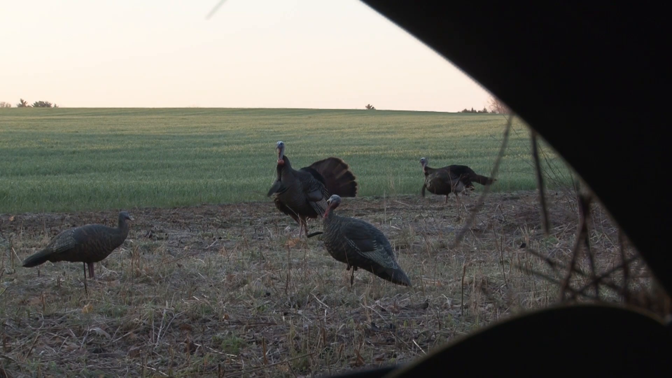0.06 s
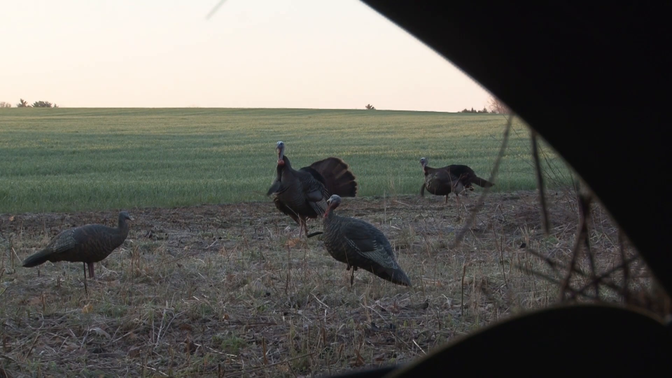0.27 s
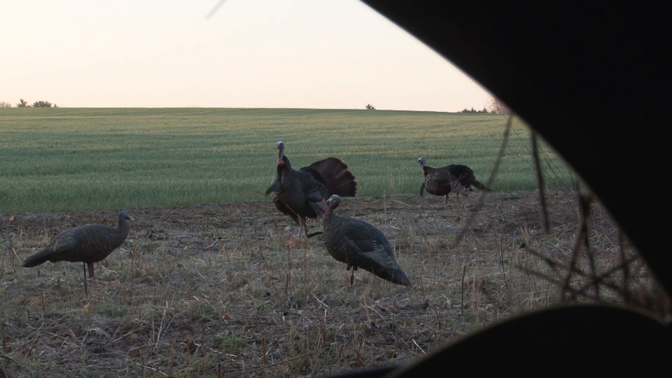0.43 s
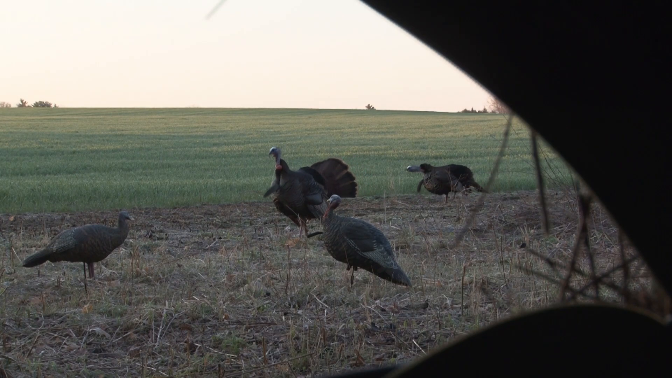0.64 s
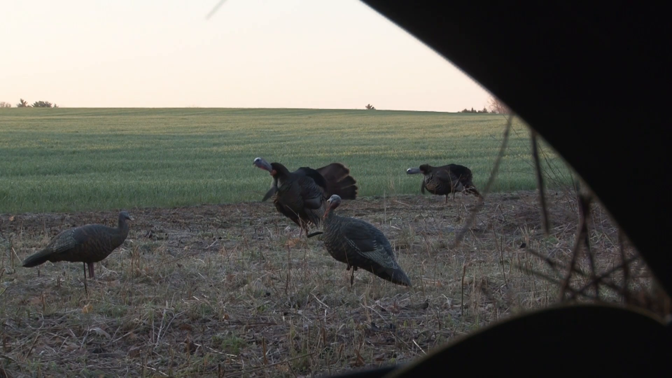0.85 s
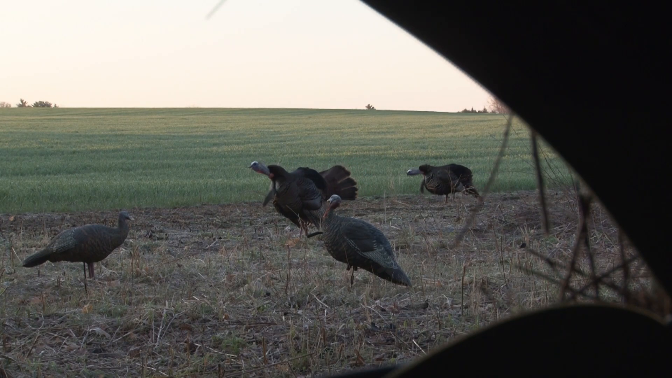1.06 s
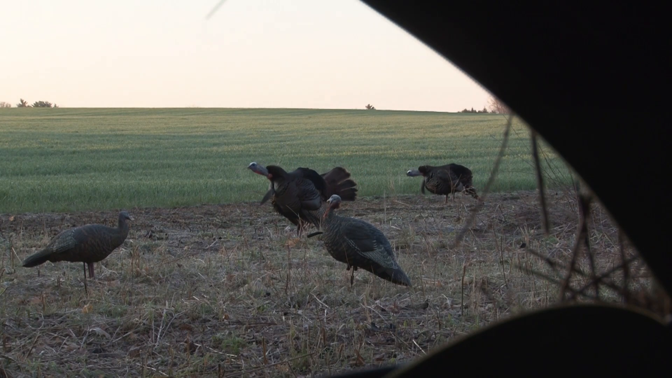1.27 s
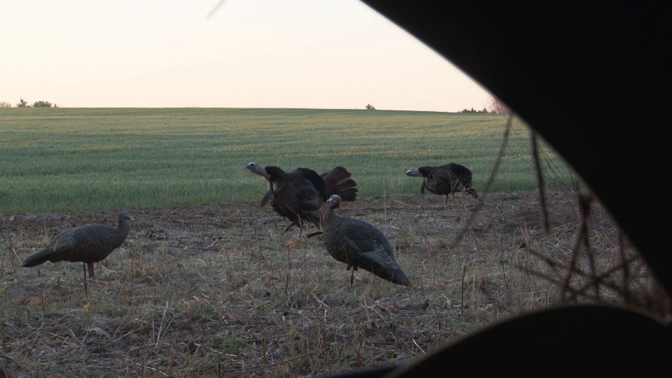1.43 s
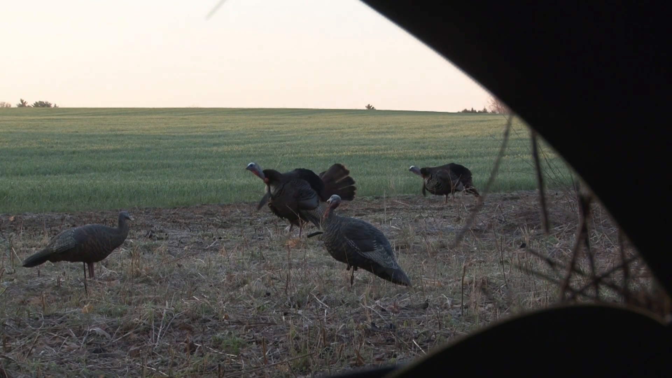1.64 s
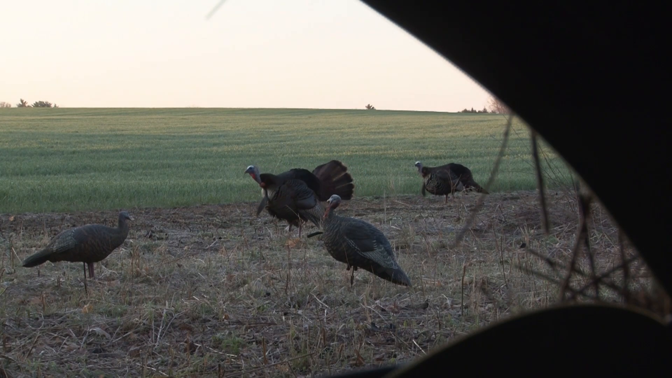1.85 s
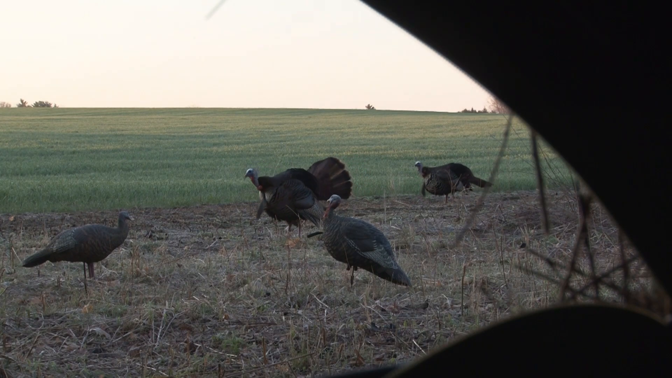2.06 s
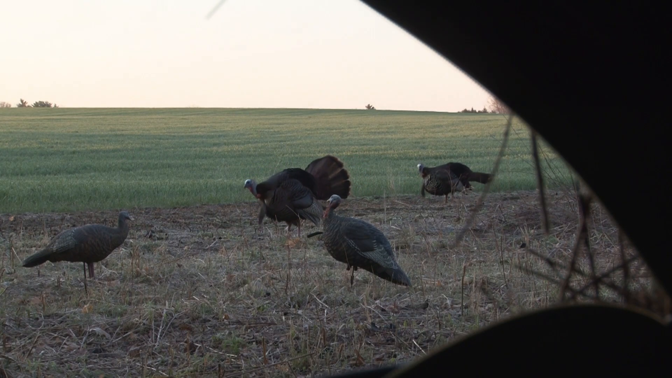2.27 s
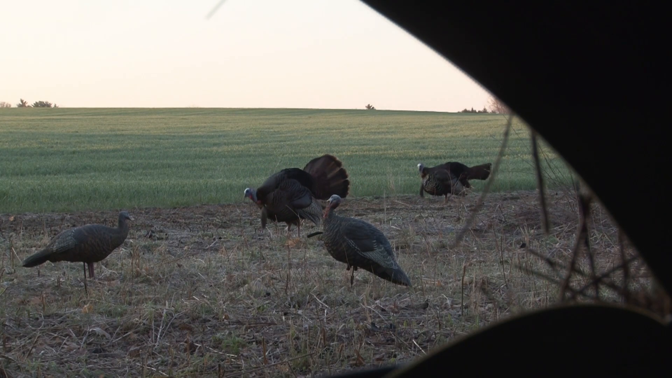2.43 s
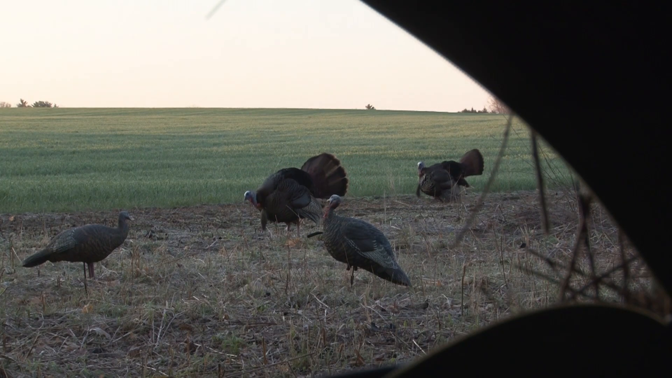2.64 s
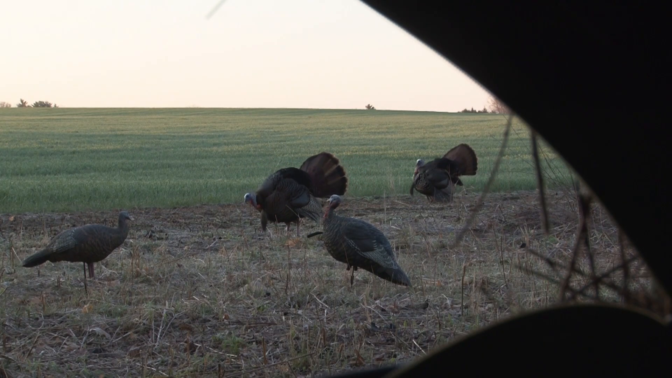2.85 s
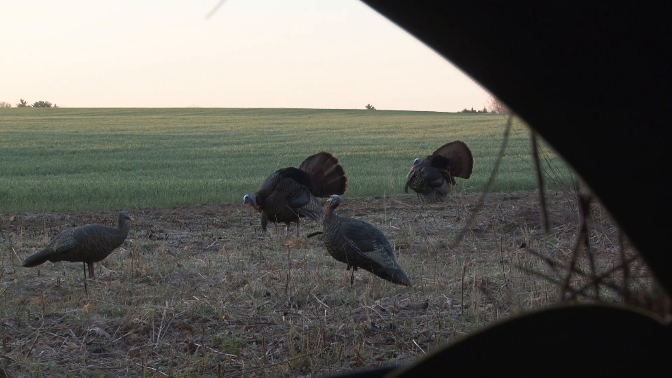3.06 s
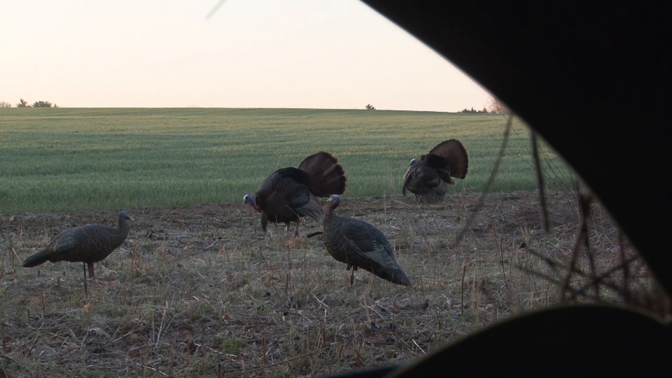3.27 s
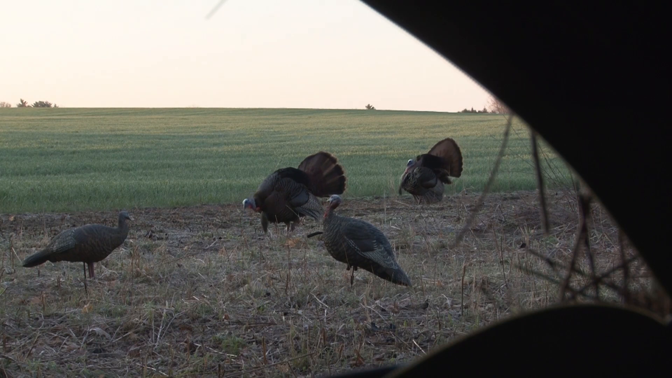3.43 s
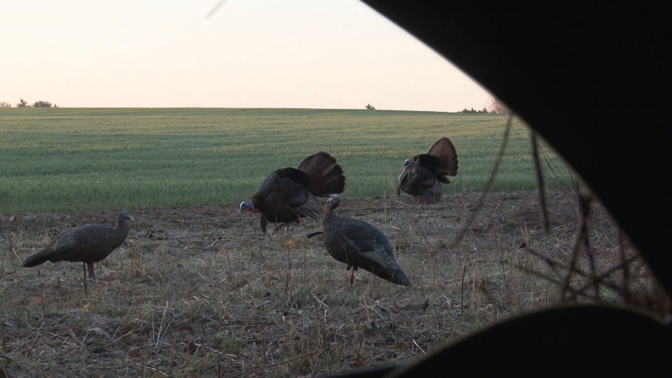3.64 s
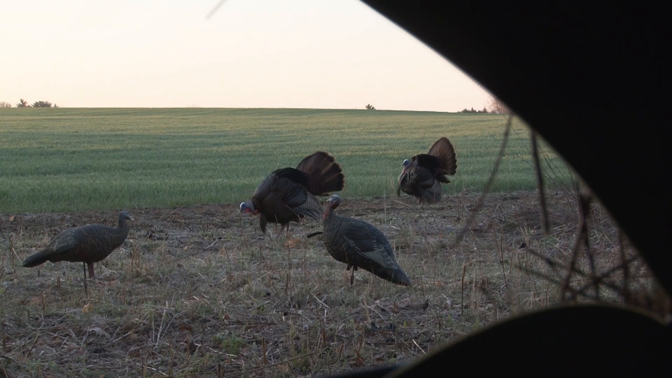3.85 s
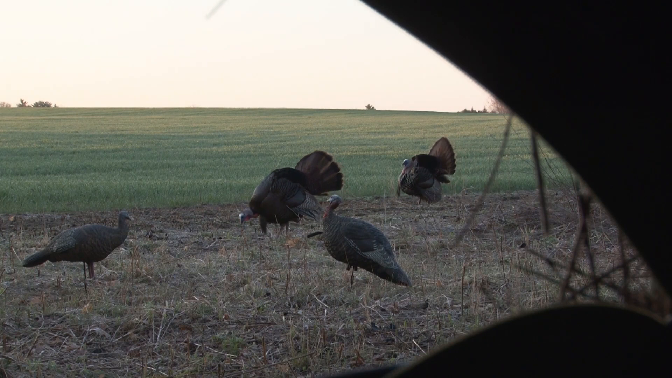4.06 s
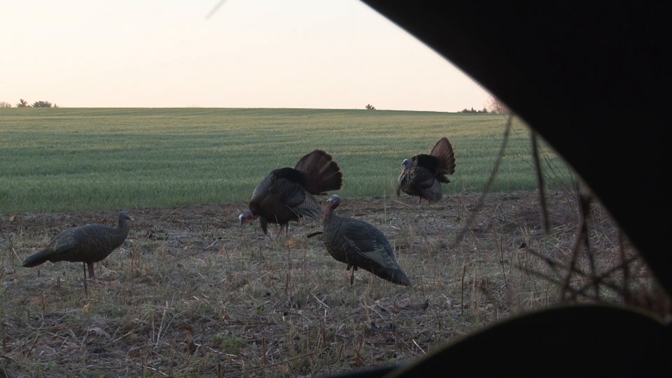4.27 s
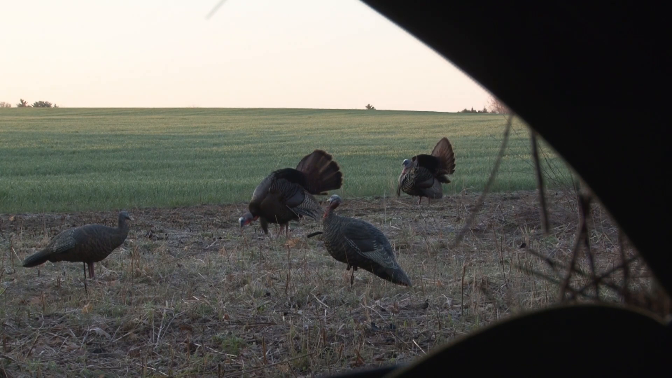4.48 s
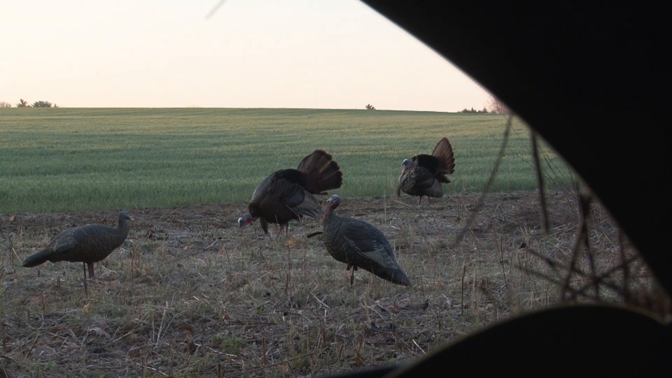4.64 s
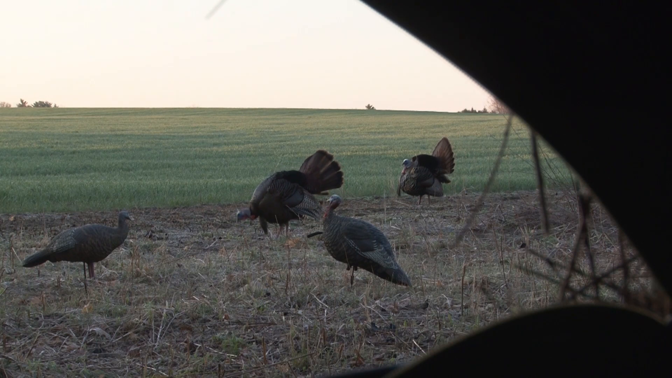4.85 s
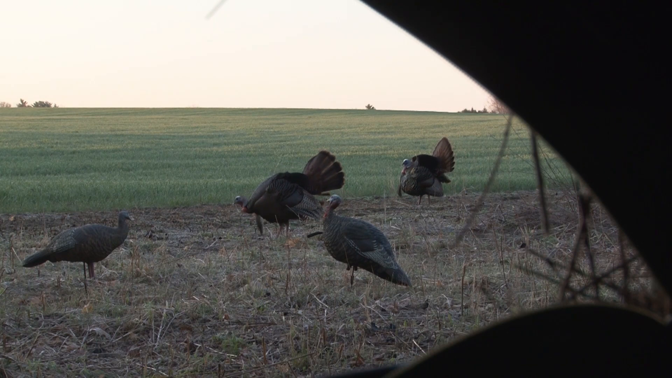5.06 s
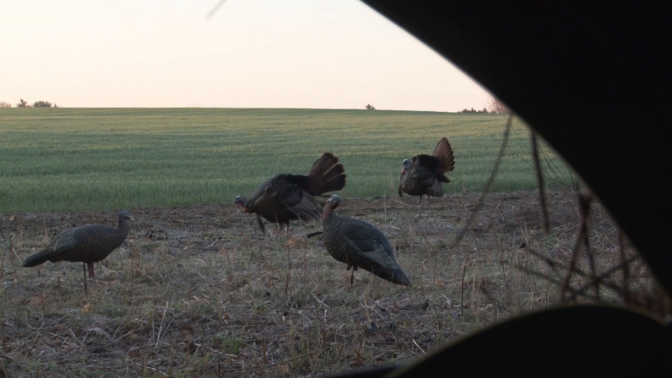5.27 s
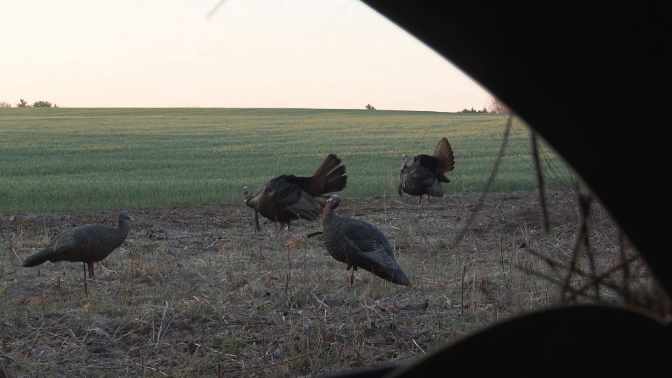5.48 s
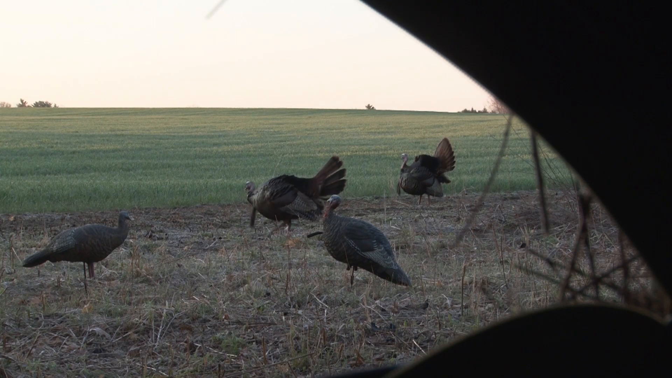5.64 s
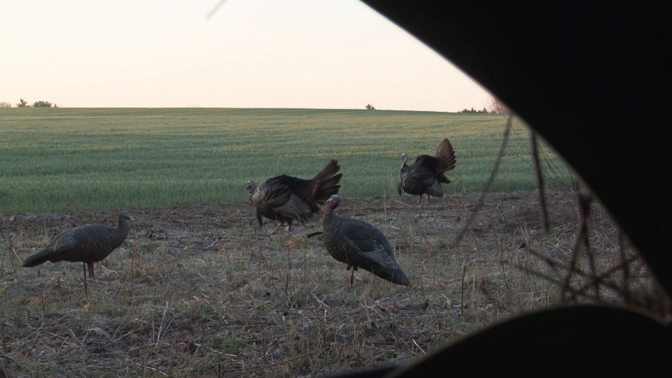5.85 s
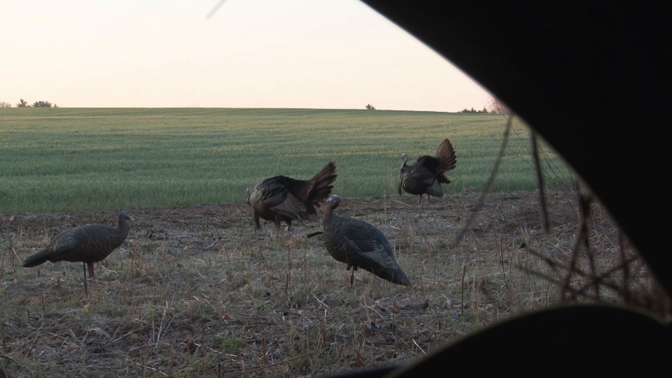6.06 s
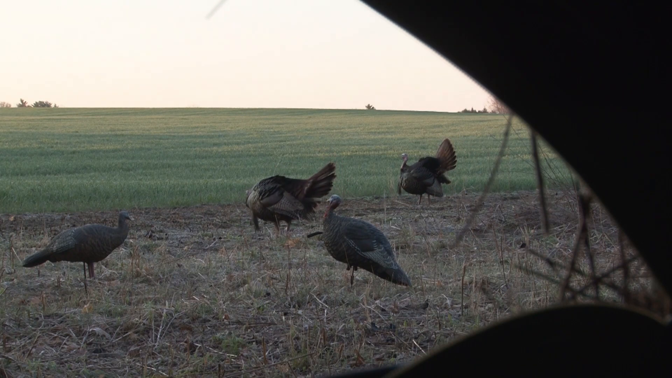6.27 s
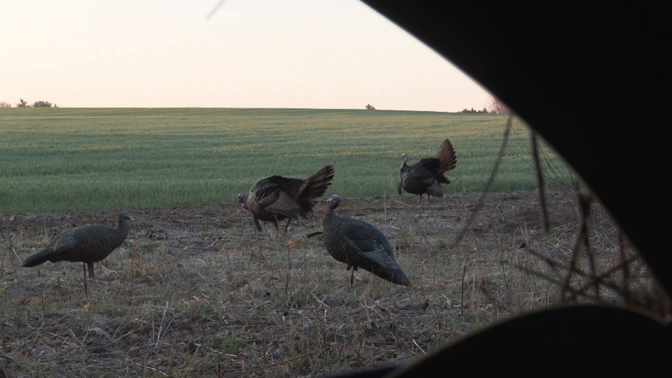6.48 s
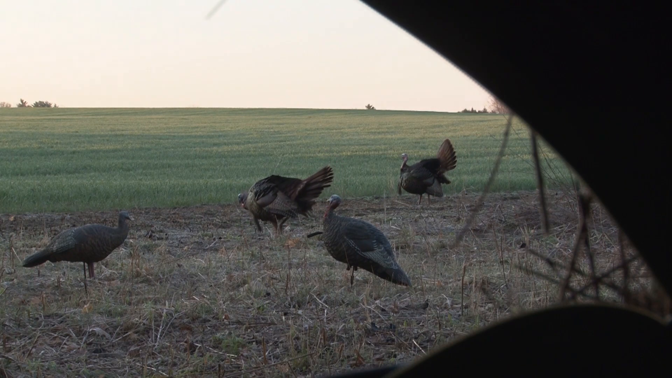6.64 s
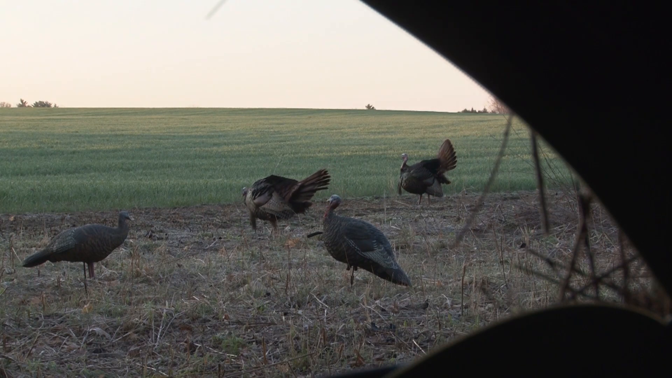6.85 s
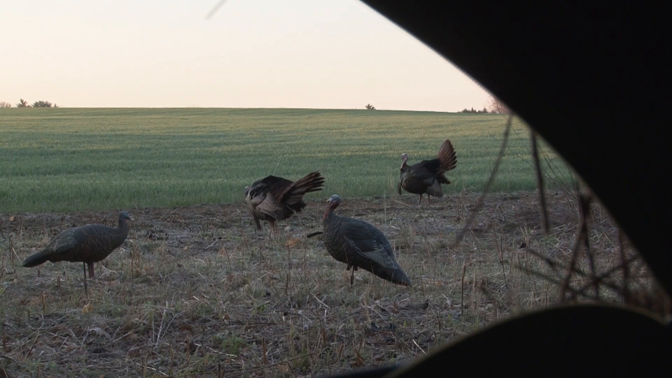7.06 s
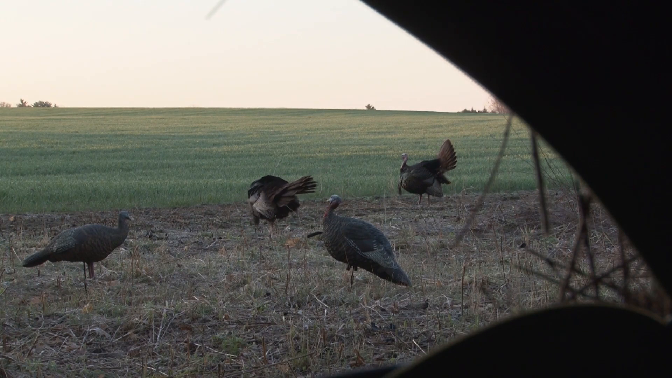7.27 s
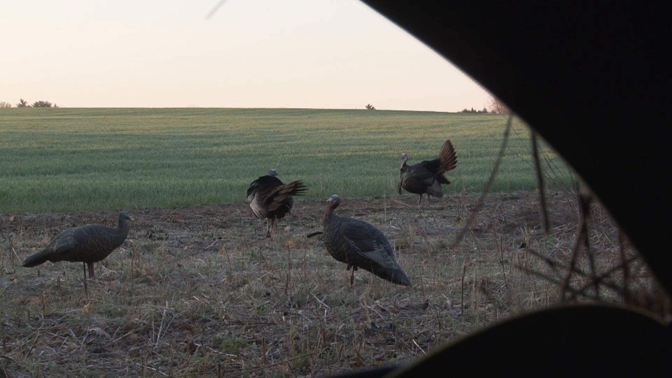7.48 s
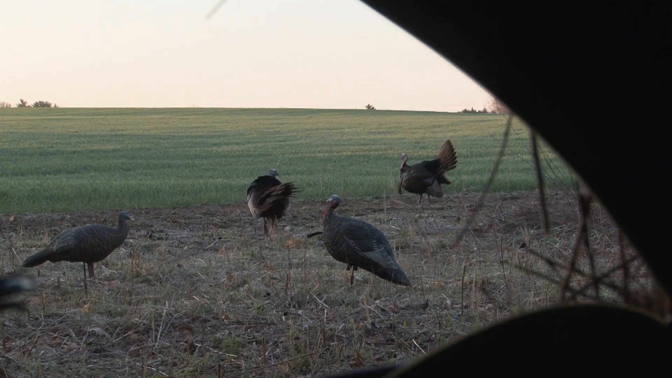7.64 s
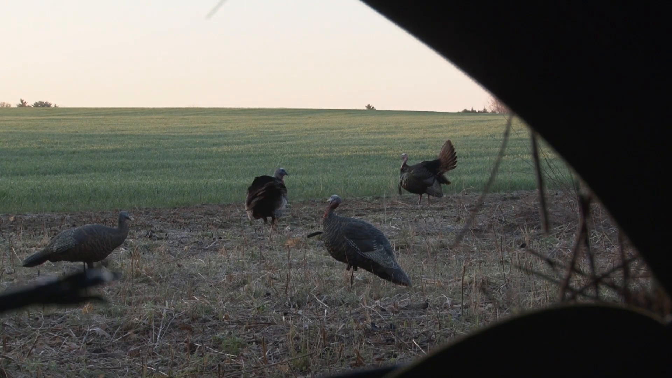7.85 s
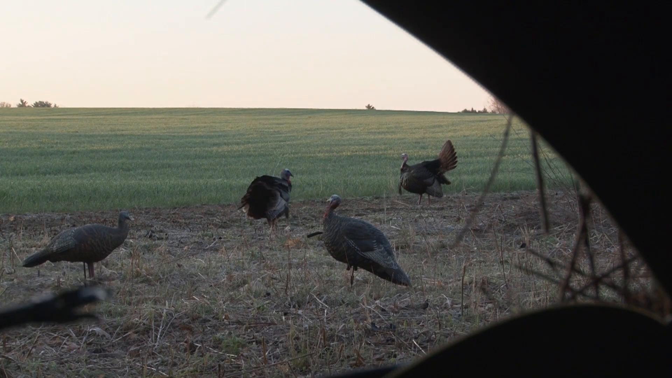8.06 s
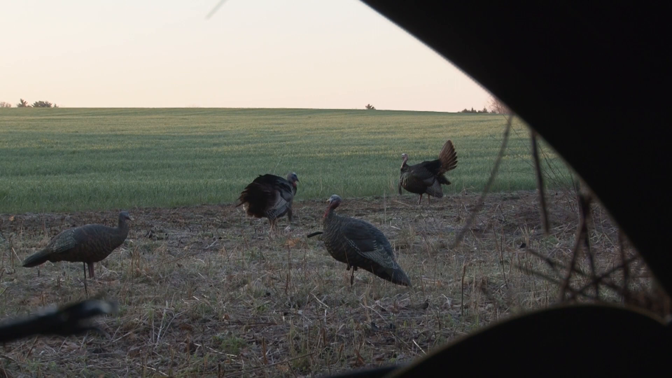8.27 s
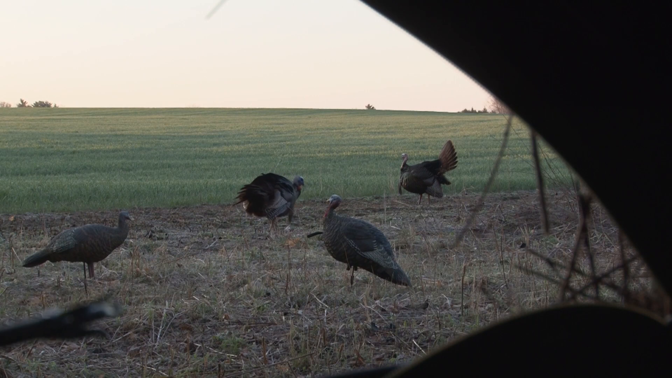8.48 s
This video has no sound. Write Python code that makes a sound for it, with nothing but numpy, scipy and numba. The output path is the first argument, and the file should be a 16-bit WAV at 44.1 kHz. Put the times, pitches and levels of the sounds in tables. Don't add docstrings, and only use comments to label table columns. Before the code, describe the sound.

Quiet open farmland with a low traffic hum and hiss. Two male turkeys erupt in one loud, overlapping, choppy gobble lasting just over a second, with sharp beak snaps and a short echoing tail. The background abruptly ducks, then returns calmer: a sharp stalk crack, dull footfalls, a breathy spit with deep drumming, thin insect chirps, small whistles, and finally rustling dry stubble. Heard in stereo from beside a hide, deep sounds leaning right.

```python
import sys
import numpy as np
from scipy import signal
from scipy.fft import rfft, irfft, next_fast_len
from scipy.io import wavfile
from scipy.ndimage import uniform_filter1d
from numba import njit

SR = 44100
rng = np.random.default_rng(int(sys.argv[2]) if len(sys.argv) > 2 else 0)


def volts(x):
    e = np.asarray(x, float) / 20
    return 10 ** e


def master_out(mix):
    frames = np.transpose(np.atleast_2d(mix))
    ceiling = np.clip(frames, -1, 1)
    pcm = np.round(ceiling * 32767).astype(np.int16)
    wavfile.write(sys.argv[1], SR, pcm)


N = 375291
T = np.arange(N) / SR

# [t/s, peak level/dB]
SNAPS = [
    (0.5984, -49.5),
    (0.7183, -53),
    (0.8114, -64),
    (0.9674, -55),
    (1.121, -50),
    (1.303, -48.5),
    (1.3841, -70),
    (1.658, -60),
]


def level(x, db):
    return x * volts(db) / np.sqrt(np.mean(x ** 2))


def colour(x, points):
    size = next_fast_len(N)
    hz, db = np.transpose(points)
    f_hz = np.arange(1, size // 2 + 2) * SR / size
    gain = volts(np.interp(np.log(f_hz), np.log(hz), db))
    return irfft(rfft(x, size) * gain, size)[..., :N]


@njit
def svf(x, hz, width):
    y, b, l = np.empty(len(x)), 0., 0.
    for i in range(len(x)):
        g, k = np.tan(np.pi * hz[i] / SR), width / hz[i]
        v = (b + g * (x[i] - l)) / (1 + g * (g + k))
        b, l, y[i] = 2 * v - b, l + 2 * g * v, k * v
    return y


def band(x, hz, width_hz):
    return svf(x + 1e-18, hz + np.zeros(len(x)), float(width_hz))


def band_twice(x, hz, width_hz):
    return band(band(x, hz, width_hz), hz, width_hz)


def walk(rate_hz, n=N):
    k = int(SR / rate_hz)
    held = np.repeat(rng.standard_normal(n // k + 1), k)
    return 1.3 * uniform_filter1d(uniform_filter1d(held, k), k)[:n]


def hump(start_s, length_s, sharp):
    u = np.clip((T - start_s) / length_s, 0, None)
    return (u / 0.48 * np.exp(1 - u / 0.39)) ** sharp


def sides(left_minus_right_db):
    return volts(np.array([[.5], [-.5]]) * left_minus_right_db)


def echoes(x, t60_s, late_s):
    t = np.arange(int(t60_s * SR)) / SR
    tail = rng.standard_normal((2, len(t))) * volts(-60 * t / t60_s) * np.minimum(t / late_s, 1)
    tail /= np.sqrt(np.sum(tail ** 2, axis=1, keepdims=True))
    return signal.fftconvolve(x, tail, axes=1)[:, :N]


def field():
    # [f/Hz, density/dB per Hz]
    air_spectrum = [(12, -52), (20, -39), (49, -13.5), (101, 1), (226, -17.5), (267, -17), (333, -17.5),
                    (372, -17.5), (566, -12), (650, -14.5), (707, -9.5), (934, -9.5), (1420, -14),
                    (2340, -32), (15600, -41)]
    # [f/Hz, left minus right/dB]
    mics = [(60, -16), (110, -19), (200, -8.5), (380, -2.5), (700, 2), (1290, 4.5), (2380, 4.5), (4400, 3),
            (8120, -0.5), (15000, -3.5)]
    out, swell = np.zeros((2, N)), walk(1.0)
    for hz in 25 * 2 ** np.arange(0, 9.6, .5):
        shared, left, right = (band(rng.standard_normal(N), hz, hz / 1.47) for _ in range(3))
        share = .5 if hz < 200 else 0.
        db = (0.1 * swell + 1.0 * walk(1.61) + 0.94 * walk(10)) * (1 if hz < 2500 else .3)
        out += volts(db) * (np.sqrt(share) * shared + np.sqrt(1 - share) * np.array([left, right]))
    left = colour(out[0], [(hz, db - 10 * np.log10(1 + volts(2 * db))) for hz, db in mics])
    right = colour(out[1], [(hz, -10 * np.log10(1 + volts(2 * db))) for hz, db in mics])
    return level(colour(np.array([left, right]), air_spectrum), -52)


def lorry():
    leaves_s, fade_db_per_s2 = 2.24, 1.5
    hz = 720 * (1 + 0.073 * walk(1.6))
    db = -58.5 - fade_db_per_s2 * np.clip(T - leaves_s, 0, None) ** 2 + 2.0 * walk(6.07)
    drone = [level(svf(svf(rng.standard_normal(N), hz, 190.0), hz, 190.0), 0) for _ in range(2)]
    rumble = level(band(band(rng.standard_normal(N), 90, 35), 79, 31), 1.8)
    return volts(db) * (sides(-7) * np.array(drone) + sides(-22.0) * rumble / volts(9.5))


def whine():
    return volts(-93) * np.sin(2 * np.pi * 13415 * T)


def syrinx(hz, rough):
    waver = 1 + .1 * rough * walk(260) + .025 * walk(30)
    phase = 2 * np.pi * np.cumsum(hz * waver) / SR
    tones = sum(volts(4.5 * walk(130)) * np.cos(k * phase + .2 * k * walk(120)) for k in range(2, 13))
    tones += volts(-9 + 5 * walk(100)) * np.cos(phase)
    noise = rng.standard_normal(N) * (0.37 + np.exp(5 * (np.cos(phase) - 1)))
    return level(tones, -9) * (1 - rough) + level(noise, 0) * rough


def throat(hz, throat_hz, throat_db, rough, gape):
    # [f/Hz, density/dB per Hz]
    closed_spectrum = [(150, -39), (280, -12.5), (430, -3), (640, -5.5), (880, -1.5), (1150, -1.5),
                       (1520, -6.5), (1790, -16.5), (2050, -4.5), (2340, -21), (2840, -12), (3680, -31),
                       (6480, -29.5), (9260, -57), (12000, -54), (15600, -76)]
    # [f/Hz, density/dB per Hz]
    open_spectrum = [(150, -57), (250, -41), (661, -3), (899, -12), (1010, -3.5), (1220, -2), (1750, 2),
                     (3680, -21), (7260, -61), (12000, -47), (15600, -80), (22000, -120)]
    source = syrinx(hz, rough)
    voice = (1 - gape) * level(colour(source, closed_spectrum), 0)
    voice += gape * level(colour(source, open_spectrum), 0)
    voice = voice + volts(throat_db) * svf(svf(voice, throat_hz, 570.0), throat_hz, 580.0)
    return voice / np.sqrt(uniform_filter1d(voice ** 2, size=900))


def breath():
    air = rng.standard_normal(N)
    hiss = band(band(air, 5320, 1700), 4440, 3500) + 1.8 * band_twice(air, 4100, 900)
    return level(hiss * volts(5.8 * walk(300)), 0)


def syllable(start_s, length_s):
    u = np.clip((T - start_s) / length_s, 0, 1)
    return np.abs(np.sin(np.pi * u ** 0.71)) ** 0.83


def gobble():
    # [t/s, peak level/dB, length/s, share of the lower tom/0-1]
    syllables = [(0.513, -20, 0.053, 0.44), (0.58, -20, 0.045, 0.53), (0.635, -39, .048, 0.6),
                 (0.662, -29.5, 0.028, 0), (0.72, -21, 0.028, 0.87), (0.74, -19.5, 0.056, 0.28),
                 (0.782, -16, .058, .55), (0.858, -27.5, 0.04, 0.55), (0.911, -23.5, 0.041, 0.45),
                 (0.951, -21, 0.018, 0.2), (0.968, -19.5, 0.02, 0), (0.994, -23.5, 0.025, 0.34),
                 (1.014, -18.5, 0.026, 0.74), (1.068, -24, .038, 0.47), (1.118, -19, 0.033, 0.2),
                 (1.163, -33, 0.057, 0.15), (1.196, -25, 0.042, 0.57), (1.257, -20, .029, 0.44),
                 (1.287, -20.5, 0.039, 0.05), (1.364, -22, 0.032, 0.33), (1.38, -18.5, .026, 0.8),
                 (1.408, -26.5, 0.023, 0.6), (1.437, -15.5, 0.034, 0.12), (1.462, -21.5, 0.032, 0.45),
                 (1.519, -20, 0.025, 0.74), (1.54, -19, .028, 0.74), (1.571, -30, 0.032, 0.09),
                 (1.6, -17.5, 0.021, 0.48), (1.617, -31, 0.018, 0.6), (1.662, -26, 0.016, 0.24)]
    # [t/s, pitch f/Hz, throat resonance f/Hz, resonance level/dB, beak gape/0-1]
    voice_course = [
        (0.499, 575, 2020, -5, 1),
        (0.559, 593, 1830, 7, 0.94),
        (0.598, 672, 1330, 7, 0.23),
        (.72, 600, 1650, -4, 0.66),
        (.79, 680, 1346, 9, .4),
        (.835, 600, 801, 7.5, 0.01),
        (0.898, 590, 1980, -19, 0.37),
        (1.101, 531, 1640, -0.5, .22),
        (1.702, 504.8, 1440, -14, 0.04),
    ]
    # [f/Hz, gain/dB]
    left_shade = [(150, -12), (500, -6.5), (1000, -0.5), (2000, 0), (4000, 2.5), (9000, 3)]
    s, *columns = np.transpose(voice_course)
    hz, throat_hz, throat_db, gape = (np.interp(T, s, c) for c in columns)
    gape = np.clip(gape, 0, 1)
    rough = .19 + (.3 - .19) * np.exp(-np.clip(T - s[0], 0, None) / .35)
    low_hz = 463.2 + (553 - 463.2) * np.exp(-np.clip(T - .8, 0, None) / .2)

    droop_per_s2, droop_s = 110, .06
    starts = np.array([0] + [row[0] - .01 for row in syllables])
    since_s = np.minimum(T - starts[np.searchsorted(starts, T, "right") - 1], droop_s)
    droop = uniform_filter1d(1 - droop_per_s2 * (1 - gape) * since_s ** 2, size=200)
    low_throat_ratio = 0.964
    high = sides(-1.5) * throat(hz * droop, throat_hz, throat_db, rough, gape)
    low = sides(0.5) * throat(low_hz * droop, throat_hz * low_throat_ratio, throat_db, rough, gape)

    hiss = breath()
    spurts = sum(volts(db + 3) * hump(s - .015, 0.041, 2.3) for s, db in SNAPS)
    call = np.ones((2, 1)) * hiss * spurts
    for s, db, length_s, share in syllables:
        turn = np.clip(share, 0, 1) * np.pi / 2
        voice = np.cos(turn) * high + np.sin(turn) * low + volts(-22 - 10 * gape) * hiss
        call += volts(db - 10) * syllable(s - .005, length_s) * voice
    call[0] = colour(call[0], left_shade)

    right_lag_samples = 6
    direct = np.array([call[0], np.roll(call[1], right_lag_samples)])
    hide = echoes(call, .07, 0.0015)
    far_lowpass = signal.butter(2, 2500, fs=SR, output="sos")
    far = signal.sosfilt(far_lowpass, echoes(call, 1.2, 0.021))
    return 0.86 * direct + volts(-3.5) * hide + volts(-8.5) * far


def chest():
    # [t/s, level/dB]
    thumps = [(.515, -59), (.58, -47.5), (.665, -48.5), (.719, -49), (.785, -45), (.856, -46), (.909, -48),
              (1.069, -49), (1.117, -51), (1.181, -46.5), (1.258, -46), (1.289, -53), (1.366, -37),
              (1.407, -52), (1.436, -42), (1.458, -46), (1.521, -32.5), (1.6, -38.5), (1.623, -59)]
    chest_hz, chest_width_hz = 93.7, 66
    body = rng.standard_normal(N)
    for wide in (1, 1.6, 2.5):
        body = band(body, chest_hz, wide * chest_width_hz)
    body = signal.sosfilt(signal.butter(3, 62, "high", fs=SR, output="sos"), body)
    return sum(volts(db) * hump(s - .01, 0.055, 1.5) for s, db in thumps) * level(body, 0)


def drums_and_coos():
    # [t/s, length/s, start f/Hz, end f/Hz, level/dB]
    hums = [
        (0.516, 0.38, 62.8, 74, -54),
        (2.967, 0.21, 58, 66.4, -52),
        (4.077, .25, 63.2, 71, -59),
        (4.499, 0.48, 58.7, 75.6, -51),
        (3.8, 0.47, 226, 221.3, -64),
        (6.946, 0.21, 220, 224, -66.5),
        (7.45, 0.34, 225, 219.3, -65),
    ]
    out = np.zeros(N)
    for s, length_s, hz0, hz1, db in hums:
        u = np.clip((T - s) / length_s, 0, 1)
        hz = (hz0 + (hz1 - hz0) * u) * (1 + 0.065 * walk(40))
        out += volts(db + 2 * walk(24)) * np.sin(np.pi * u) * np.sin(2 * np.pi * np.cumsum(hz) / SR)
    return out


def snaps():
    air = level(band_twice(rng.standard_normal(N), 11000, 8000), 0)
    return sum(volts(db - 9.0) * hump(s - .003, 0.011, 1.5) for s, db in SNAPS) * air


def stalk_cracks():
    # [t/s, peak level/dB, centre f/Hz, left minus right/dB]
    cracks = [(2.2917, -57, 3590, -9), (2.3104, -36, 4240, 1), (4.2747, -44.5, 3030, 10),
              (4.579, -52, 2890, 10), (4.9912, -61, 2630, -5.5), (6.0495, -56, 7000, 6.5),
              (6.6957, -45, 2920, 11), (6.7793, -51, 2560, 10), (6.8492, -56, 4250, 9),
              (7.2994, -55, 2930, 8), (7.547, -54, 2830, 15), (7.929, -50, 5500, 5),
              (8.1377, -49, 3200, 8.5)]
    t = np.arange(8000) / SR
    tick = 0.49 * volts(-60 * t / 0.04)
    tail = 0.44 * np.minimum(t / 0.037, 1) * volts(-60 * t / 0.085)
    shape = np.minimum(t / 0.004, 1) ** 2 * (tick + tail)
    out = np.zeros((2, N))
    for s, db, hz, pan_db in cracks:
        i = int(s * SR)
        for c in range(2):
            noise = rng.standard_normal(len(t))
            body = level(band_twice(noise, hz, 0.64 * hz), 0)
            top = level(band_twice(noise, 12000, 6000), -19)
            out[c, i:i + len(t)] += volts(db - 2.0) * sides(pan_db)[c] * shape * (body + top)
    return out


def rustle():
    # [t/s, length/s, level/dB]
    flurries = [
        (2.3, 1.7, -97.5),
        (4.45, 0.6, -75.5),
        (6.616, 0.74, -68.5),
        (7.4, 0.88, -67),
    ]
    swells = sum(volts(db) * hump(s, length_s, 1.2) for s, length_s, db in flurries)
    ticks = rng.standard_normal((2, N)) * (rng.random((2, N)) < .05) * volts(2.5 * walk(30))
    return swells * sides(2.7) * level(np.array([band(c, 3100, 6400) for c in ticks]), 0)


def steps():
    # [t/s, level/dB, centre f/Hz]
    footfalls = [
        (2.83, -56.5, 218),
        (2.9, -58.5, 262),
        (3.03, -57, 201),
        (3.17, -56.5, 290),
        (3.4, -69, 254),
    ]
    out = np.zeros(N)
    for s, db, hz in footfalls:
        out += volts(db) * hump(s, 0.046, 0.6) * level(band(rng.standard_normal(N), hz, 0.34 * hz), 0)
    return out


def spit():
    # [f/Hz, width/Hz, level/dB]
    burst = (2.992, 0.048, [(2280, 1300, -48), (5400, 2000, -57), (8900, 2500, -61.5)])
    s, length_s, mouth = burst
    air = rng.standard_normal((2, N))
    bands = [level(np.array([band_twice(c, hz, width_hz) for c in air]), db) for hz, width_hz, db in mouth]
    return hump(s, length_s, 1.8) * sum(bands)


def birds():
    # first t/s, period/s, f/Hz, level/dB
    chirp_run = (3.42, .116, 4950, -78)
    # [t/s, length/s, start f/Hz, end f/Hz, level/dB]
    far_notes = [
        (4.981, 0.112, 2620, 2670, -66.5),
        (5.127, 0.058, 2700, 2750, -70),
        (5.17, 0.26, 1770, 1760, -65.5),
        (5.406, 0.11, 1800, 1800, -68),
        (5.48, 0.036, 3010, 2713, -68),
        (5.518, 0.079, 2280, 2320, -71),
        (7.215, 0.31, 1470, 1574, -59.5),
        (5.42, 0.13, 1300, 1500, -59.5),
        (7.65, 0.52, 2700, 2690, -71),
    ]
    # [t/s, length/s, start f/Hz, end f/Hz, level/dB]
    near_notes = [
        (4.19, .06, 2500, 2500, -71),
        (5.68, 0.057, 3230, 2882, -70),
        (6.19, .09, 2780, 2795, -64),
        (6.158, 0.101, 2900, 2744, -62),
        (6.216, 0.062, 2760, 2536, -60),
        (6.291, 0.17, 2430, 2500, -73),
        (6.374, 0.034, 3400, 3420, -63),
        (6.4, 0.036, 3260, 2660, -62),
        (6.445, 0.088, 3280, 3410, -77.5),
        (7.46, 0.063, 2150, 2110, -69),
    ]
    first_s, period_s, chirp_hz, chirp_db = chirp_run
    notes = [(*n, 85 * 2900 / n[2]) for n in far_notes]
    notes += [(*n, 45) for n in near_notes]
    for k in range(7):
        notes.append((first_s + k * period_s, .04, chirp_hz - 150, chirp_hz + 150, chirp_db, 250))
    out = np.zeros((2, N))
    for s, length_s, hz0, hz1, db, spread_hz in notes:
        n = int(length_s * SR)
        u = np.arange(n) / n
        hz = hz0 + (hz1 - hz0) * u
        tone = np.sqrt(2) * np.sin(2 * np.pi * np.cumsum(hz) / SR)
        blur = level(svf(svf(rng.standard_normal(n), hz, 2. * spread_hz), hz, 2. * spread_hz), 0)
        share = np.clip(spread_hz / 130, 0, 1)
        note = np.sqrt(np.sin(np.pi * u)) * ((1 - share) * tone + share * blur)
        out[0, int(s * SR):][:n] += volts(db + 4.0) * note
    out[1] = volts(-7) * out[0]
    return 0.64 * out + volts(-1.0) * echoes(out, 0.32, 0.0037)


def gain_db():
    shut_db, opens_s, open_s, hot_db, sag_db_per_s2 = -7.5, 0.18, 0.54, 4.5, 1.55
    dip_s, duck_db, duck_in_s, duck_out_s, after_db = 2.172, -12, 0.063, 0.027, -0.47
    opening_db = (shut_db - hot_db) * np.clip((open_s - T) / (open_s - opens_s), 0, 1)
    before_db = hot_db + opening_db - sag_db_per_s2 * np.clip(T - open_s, 0, None) ** 2
    away = np.where(T < dip_s, (dip_s - T) / duck_in_s, (T - dip_s) / duck_out_s)
    return np.where(T < dip_s, before_db, after_db) + duck_db * np.clip(1 - away, 0, 1)


def scene():
    bass = (chest() + drums_and_coos() + steps()) * np.array([[volts(-16.0)], [volts(5.5)]])
    ambience = field() + lorry() + whine()
    return ambience + gobble() + bass + snaps() + stalk_cracks() + rustle() + spit() + birds()


def band_limit(x):
    return signal.sosfilt(signal.butter(12, 15710, fs=SR, output="sos"), x)


def record(dry):
    mix = dry * volts(gain_db())
    return band_limit(mix)


dry = scene()
out = record(dry)
master_out(out)
```